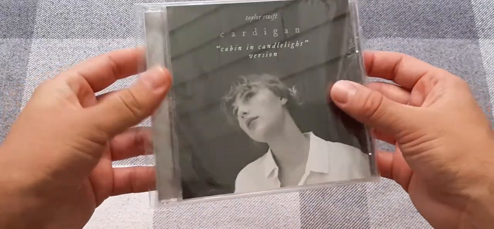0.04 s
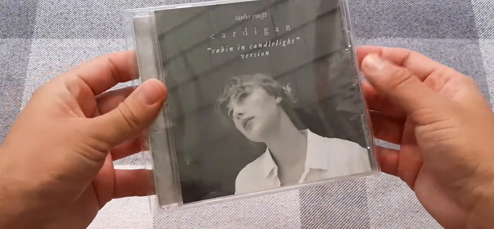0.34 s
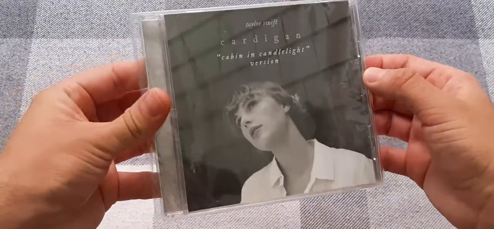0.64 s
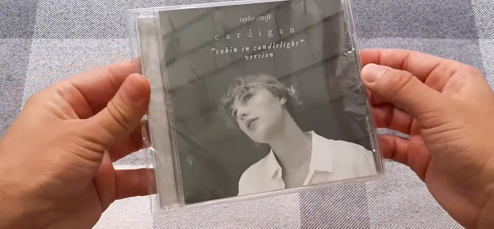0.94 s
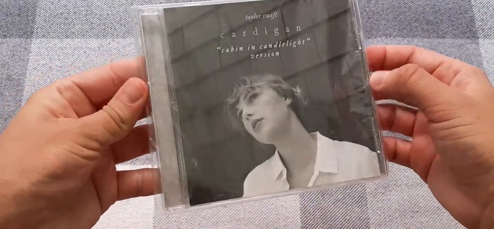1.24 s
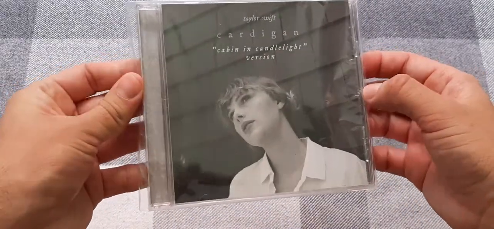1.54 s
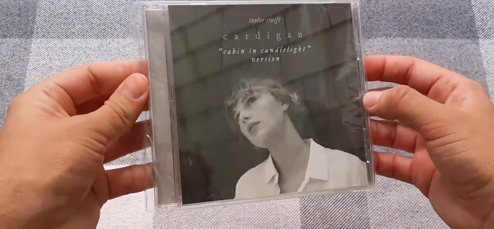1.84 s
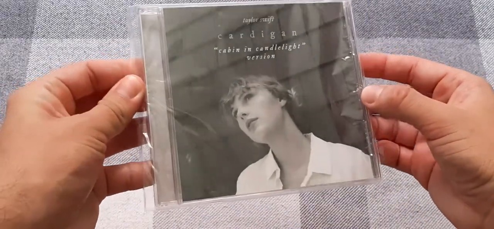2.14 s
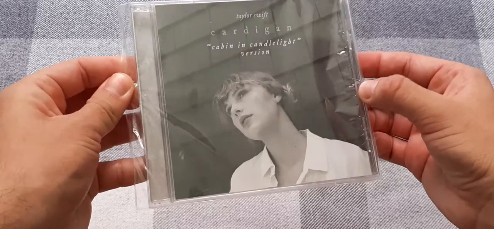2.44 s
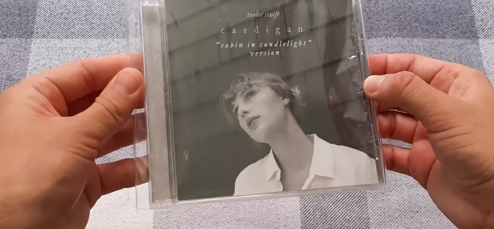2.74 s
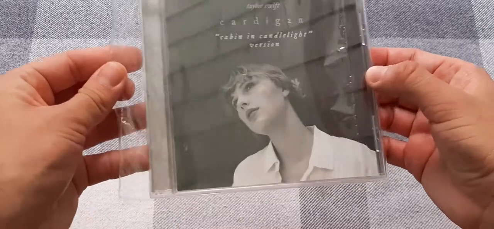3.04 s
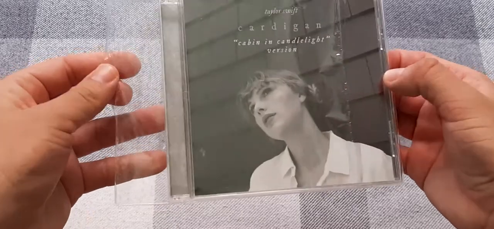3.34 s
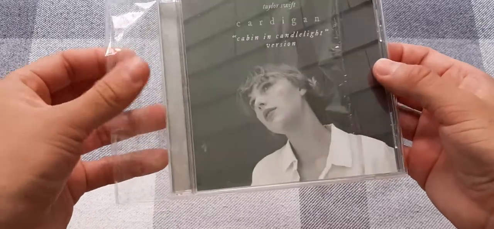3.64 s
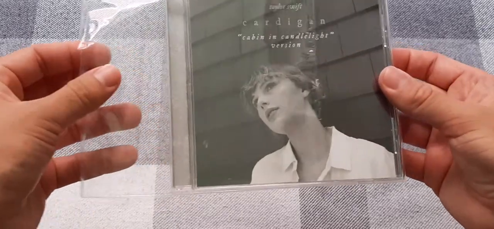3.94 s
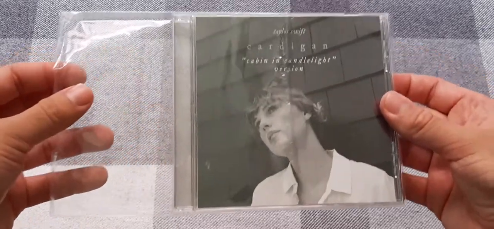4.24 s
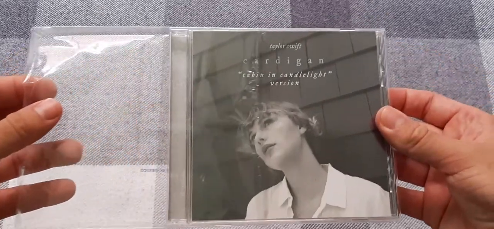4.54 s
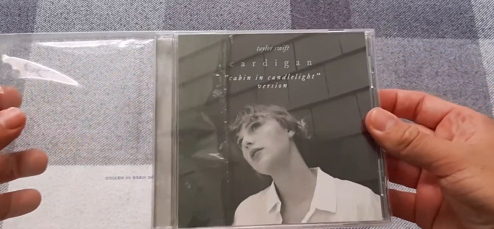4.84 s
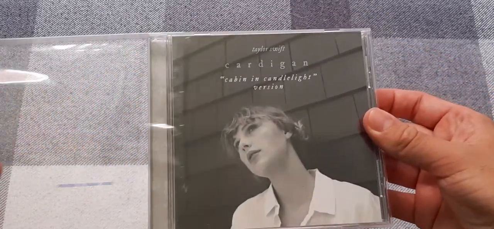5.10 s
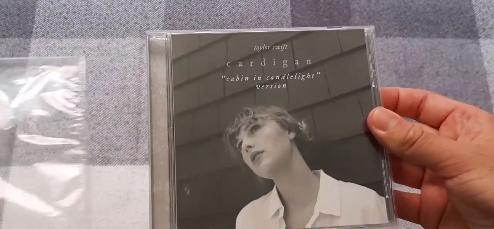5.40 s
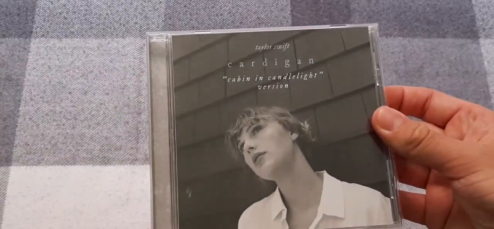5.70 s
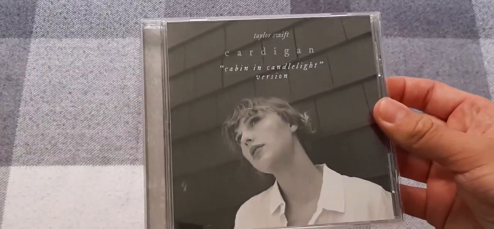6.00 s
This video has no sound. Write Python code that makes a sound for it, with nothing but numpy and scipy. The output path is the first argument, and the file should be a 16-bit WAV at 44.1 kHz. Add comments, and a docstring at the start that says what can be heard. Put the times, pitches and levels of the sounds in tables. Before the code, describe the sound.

Close, crisp crackling of plastic film being torn off a hollow plastic case, with a dull bump before the wrap is pulled away.

```python
"""Shrink wrap snaps and crinkles as two hands tear it off a thin plastic disc case, close to a
camera's stereo microphone and a little to its left, in a small room. Creases pop in the stretched
film and knock the hollow case, which bumps as the wrap comes loose. The sleeve of film is then
drawn off, ticking over the case's ribbed edge and ringing while taut, and is put aside.
Behind it are the room's short echo, a low rumble and faint hiss."""
import sys
import numpy as np
from scipy import signal
from scipy.fft import rfft, irfft, next_fast_len
from scipy.io import wavfile
from scipy.ndimage import uniform_filter1d

SR = 44100
rng = np.random.default_rng(int(sys.argv[2]) if len(sys.argv) > 2 else 0)


def wav_record(signal):
    """Record a signal, one row per channel, as 16-bit PCM in the file named by sys.argv[1]."""
    frames = np.transpose(np.atleast_2d(signal))
    bounded = np.clip(frames, -1, 1)
    # unit amplitude maps onto the largest positive 16-bit level
    quanta = np.round(bounded * 32767).astype(np.int16)
    wavfile.write(sys.argv[1], SR, quanta)


N = 276047
LEAD_IN_S = .003  # faint rise of noise just before a snap
WRAP_LOOSE_S = 3.72  # the fingers keep shifting on the wrap until then
STEADY_RIBS_PER_S = 100  # a steady pull on the sleeve


def loud_snaps():
    """Creases pop and tears jump. Returns the film's cracks and their knocks on the case beneath."""
    # the loudest pops: (time [s], level [dB], pitch [Hz], knock relative to the level [dB])
    pops = [(.0183, -35.5, 8520, -46), (.1089, -46, 7400, 1), (.1187, -43.5, 7300, -2),
            (.1592, -38.5, 10000, -1), (.3015, -50.5, 4700, -38), (.3498, -40.5, 3730, -11.5),
            (.3612, -38.5, 9400, -22), (.3871, -33.5, 11750, -16), (.4551, -62, 10200, -43),
            (.5745, -35, 8590, -37.5), (.639, -28.5, 13370, -42), (.7022, -32, 4220, -39),
            (.7107, -38.5, 13860, -10), (.7596, -42.5, 14500, -28), (.8762, -43.5, 14300, -13),
            (.9242, -44, 6000, -32), (.9761, -34.5, 2750, -39), (1.0096, -40.5, 12600, -9),
            (1.205, -45.5, 8320, -37.5), (1.2193, -49, 11690, -34), (1.2831, -29.5, 12700, -15),
            (1.2935, -32.5, 8500, -31), (1.3012, -30.5, 7600, -9), (1.3041, -33.5, 7070, -39),
            (1.4628, -48, 14300, -31), (1.478, -50, 12630, -18), (1.514, -33, 14820, -18),
            (1.5485, -37.5, 8980, -24), (1.5742, -39, 10900, -23), (1.6318, -36.5, 14000, -28),
            (1.669, -31, 8700, -16), (1.6881, -29, 9200, -31.5), (1.7067, -39, 6980, -38),
            (1.743, -44, 3110, -5.5), (1.8075, -46, 14300, -18), (1.8716, -38.5, 7150, -19.5),
            (1.8976, -26.5, 11390, -11.5), (1.992, -45, 11960, -5.5), (2.041, -43, 9240, -15),
            (2.0575, -34.5, 10630, -26.5), (2.0823, -37, 11900, -3), (2.2692, -50, 11700, -10),
            (2.3071, -42, 6750, -30.5), (2.338, -40.5, 4175, -37), (2.3743, -42.5, 6370, 1),
            (2.3949, -31.5, 11700, -41), (2.433, -37.5, 12000, -42), (2.564, -32, 12260, -33),
            (2.586, -29.5, 13250, -8), (2.6046, -31.5, 6060, -33), (2.6109, -26.5, 8960, -14),
            (2.6444, -29, 5500, -13), (2.6933, -39, 12300, -40.5), (2.8023, -29.5, 9400, -35),
            (2.8346, -22.5, 12520, -11), (2.8804, -33, 10980, -9.5), (2.9926, -34.5, 4760, -9),
            (3.0232, -30, 13800, -21), (3.0749, -31.5, 14100, -6.5), (3.1025, -31, 13200, -7),
            (3.1623, -37.5, 14300, -18), (3.2345, -26.5, 11300, -13), (3.3045, -40, 12250, 3),
            (3.3971, -38.5, 4750, -2), (3.4416, -37, 1720, 2), (3.478, -23.5, 6040, -9.5),
            (3.494, -29.5, 11300, -32.5), (3.5955, -44, 12300, -2.5), (3.7007, -37, 6400, -4),
            (3.704, -37.5, 6600, -3.5), (3.9043, -43, 6060, 3), (4.0786, -45, 5850, -17),
            (4.5061, -48, 5500, -9), (4.5246, -52, 11900, -3), (4.6366, -46, 4700, -1),
            (5.1, -38, 7740, -4), (5.25, -52, 5500, -6), (5.3445, -55, 6500, -14), (5.376, -50, 4560, -9),
            (5.4123, -50.5, 12100, -17), (5.8696, -48, 8600, -25), (5.902, -46.5, 3200, -33)]
    film, blows = np.zeros((3, N)), np.zeros(N)
    for s, db, pitch_hz, knock_db in pops:
        add(film, s - LEAD_IN_S, amp(db + .5) * facet_snap(pitch_hz))
        add(blows, s, amp([db + knock_db]))
    rattle = stereo_noise(amp(-1) * fading(blows, life_s=.00099))
    return film, through_case(amp(8.5) * blows + rattle, modes_db=-6.5)


def small_snaps(crinkling, count):
    """Lesser facets flip at random under the fingers, more often and louder in a harder grip."""
    ordinary_grip_db, centre_hz = -57, 8500
    film = np.zeros((3, N))
    effort = crinkling[:int(WRAP_LOOSE_S * SR)] / amp(ordinary_grip_db)
    chance = np.cumsum(np.minimum(effort, 1))
    for when, loud, high in rng.random((count, 3)):
        at = np.searchsorted(chance, when * chance[-1])
        gain = effort[at] ** .37 * amp(-47 + 5.5 * (2 * loud - 1.5))
        pitch_hz = centre_hz * 2 ** (.9 * (2 * high - 1))
        add(film, at / SR - LEAD_IN_S, gain * facet_snap(pitch_hz))
    return film


def facet_snap(pitch_hz, size=512):
    """One facet of film cracks and flutters, after a faint lead-in. Rows: left mic, right mic, room."""
    rise_s, life_s = .0009, .0011
    lean_db = rng.normal(1, 1.1)  # each facet faces the mics its own way
    t = np.arange(size) / SR - LEAD_IN_S
    flutter = rng.standard_normal(size) + 2.3 * rng.standard_normal((2, size))
    flutter *= np.where(t < 0, .4 * np.exp(-np.abs(t) / rise_s), np.exp(-np.abs(t) / life_s))
    push = np.vstack([1.3 * flutter / np.linalg.norm(flutter[0]), np.zeros(size)])
    push[:, int(LEAD_IN_S * SR)] += rng.choice([-1, 1])
    push[:2, int((LEAD_IN_S + rng.uniform(.0005, .0014)) * SR)] += .3  # bounce off the table
    # spectrum of snapping film: (frequency [Hz], level [dB])
    snap_colour = [(400, -32), (1200, -4.5), (2800, -1.5), (4300, 1), (5700, 1), (8000, 3), (10000, 2.5),
                   (13000, 1), (16000, 0)]
    peak_db = lambda hz: 9 * np.exp(-.5 * (np.log2((hz + 1) / pitch_hz) / .3) ** 2)
    facet = ring(lambda hz: along(snap_colour, hz) + peak_db(hz), size=size)
    crack = signal.fftconvolve(push, facet[None], axes=1)
    crack *= np.sqrt(.003 * SR) / np.linalg.norm(crack, axis=1, keepdims=True)
    return amp([[lean_db], [-lean_db], [0]]) * crack


def crinkle(case_gain, film_gain, fizz_gain):
    """Countless tiny creases of uneven size, over the smooth hiss of film rubbing on plastic."""
    # spectrum of crinkling film: (frequency [Hz], level [dB])
    film_colour = [(1200, -32.5), (2000, -6.5), (3000, -5.5), (4500, -5), (5700, -4.5), (8000, -8),
                   (10000, -5), (14000, -39)]
    # spectrum of its high fizz: (frequency [Hz], level [dB])
    fizz_colour = [(5000, -30), (8000, -6), (10000, -2.5), (12500, -.5), (15500, -1.5), (17000, -6)]
    creases_per_s = 300
    largest = 3.3 - 1.2 * np.minimum(5 * sleeve_speed(), 1)  # a freely sliding sleeve hardly buckles
    onsets = rng.random(N) < creases_per_s / SR
    creases = onsets * amp(2.5 * np.minimum(rng.exponential(size=N), largest))
    grain = unit(np.hypot(fading(creases, life_s=.0005), .4))
    body = case_gain * unit(through_case(stereo_noise(np.sqrt(grain)), modes_db=-10.5))
    film = film_gain * unit(coloured(stereo_noise(grain), film_colour))
    fizz = fizz_gain * unit(coloured(stereo_noise(grain), fizz_colour))
    return amp(-.5) * body + amp(-.41) * bending(film + fizz, depth_db=3)


def handling():
    """Crinkle gains for case, film and fizz: sliding, light touch, grips and swishes add in power."""
    # hiss of the sleeve at a steady pull: (case [dB], film [dB], fizz [dB])
    slide_db = [-83.5, -63, -58]
    # light touch of the fingers: (case [dB], film [dB], fizz [dB])
    touch_db = [-88, -80, -76]
    # squeezes and tugs: (time [s], hold [s], film level [dB], case re film [dB], fizz re film [dB])
    grips = [(0, 0.0083, -51, -5.5, 0), (0.103, 0.036, -53, -3, -2), (0.349, 0.097, -64.5, -8.5, 6),
             (.575, 0.022, -62, -8, 11), (0.641, 0.044, -54.5, -7, -5.5), (0.702, 0.028, -55, -14, 2),
             (0.781, 0.0313, -70.5, -24, 11.5), (0.888, 0.11, -56.5, -14.5, -2.5),
             (.975, 0.064, -55.5, -25, -6), (1.06, 0.25, -69.5, -11, 7), (1.244, 0.025, -63, -6, 7),
             (1.278, 0.011, -46, -8.5, 5.5), (1.47, .02, -69.5, 2, 12.5), (1.509, 0.12, -64.5, -2.5, -2.5),
             (1.685, 0.033, -54, -8.5, 3), (1.73, 0.015, -67.5, 2, 2), (1.81, .07, -67, -5, 3),
             (1.888, .035, -55, -6, 0.5), (1.96, 0.12, -62.5, -5, 8.5), (2.048, 0.015, -59, 2, 6.5),
             (2.325, .05, -61.5, -18, -7), (2.375, .065, -62.5, -5.5, 7), (2.5, 0.078, -56.5, -11, -1.5),
             (2.563, 0.024, -56, -6, 3), (2.578, 0.022, -43.5, -4, 0), (2.641, 0.092, -53, -9, -1),
             (2.768, .06, -60, -15.5, 7), (2.83, 0.078, -51, -7, 1), (2.973, 0.11, -52, 0.5, 3.5),
             (3.059, 0.074, -48, 0.5, 4.5), (3.161, 0.021, -50, -1.5, 4), (3.232, 0.13, -56.5, 1, 3),
             (3.394, .04, -54, -6.5, -0.5), (3.442, 0.012, -48.5, 0, 3), (3.478, 0.068, -50.5, -8, -2.5),
             (3.69, 0.049, -54.5, 0.5, 0), (3.75, 0.079, -62.5, -2, -2), (4.505, 0.016, -62, 0.5, -5),
             (5.172, 0.063, -53, -6, -1), (5.34, 0.11, -70.5, -16, -4), (5.89, 0.052, -66, -12, 1)]
    # loose film brushing: (time [s], length [s], film level [dB], case re film [dB], fizz re film [dB])
    swishes = [(3.85, .17, -60.5, 3, -12), (4.98, 0.3, -57, -7, 6.5), (5.639, 0.32, -68, -19, -1),
               (5.98, .16, -78, -12.5, -3.5)]
    t = np.arange(N) / SR
    power = (amp(slide_db)[:, None] * sleeve_speed() ** 1.18) ** 2
    power += amp(touch_db)[:, None] ** 2 * (t < WRAP_LOOSE_S)
    for s, hold_s, db, case_db, fizz_db in grips:
        grip = stroke(0, attack_s=.006, hold_s=hold_s, release_db_per_s=269)[:SR]
        add(power, s, (amp([[db + case_db], [db], [db + fizz_db]]) * grip) ** 2)
    for s, length, db, case_db, fizz_db in swishes:
        swell = np.sin(np.pi * t[t < length] / length)
        add(power, s, (amp([[db + case_db], [db], [db + fizz_db]]) * swell) ** 2)
    return np.sqrt(power)


def bending(x, depth_db):
    """The film's resonances wander as it bends: patches of random gain over frequency and time."""
    spectra = signal.stft(x, nperseg=256)[2]
    patches = uniform_filter1d(rng.standard_normal(spectra.shape[1:]), size=9, axis=0)
    patches = uniform_filter1d(patches, size=12, axis=1)
    return signal.istft(spectra * amp(depth_db * unit(patches)), nperseg=256)[1][:, :N]


def through_case(x, modes_db):
    """The hollow case answers like a broad plate with a few sharper resonances."""
    # response of the plate: (frequency [Hz], level [dB])
    case_colour = [(150, -34.5), (240, -19.5), (330, -5.5), (560, -9), (850, 0), (1040, -6), (1450, 5.5),
                   (2100, -6.5), (3000, -14.5), (4200, -45)]
    # resonances of the case: (frequency [Hz], width [Hz], relative level [dB])
    case_modes = [(432, 8.3, 11.5), (638, 13, -15.5), (725, 27, 8), (802, 16, 14), (910, 31, 3),
                  (1216, 36, -15), (1417, 420, -3), (1840, 30, -17.5)]
    modes = lambda hz: sum(amp(db) * 1j * hz * width / (centre ** 2 - hz ** 2 + 1j * hz * width)
                           for centre, width, db in case_modes)
    return filtered(coloured(x, case_colour), lambda hz: 1 + amp(modes_db) * modes(hz))


def case_bumps():
    """The case flexes with hollow knocks; the dullest comes as the wrap lets go."""
    # jolts of the case in the hand: (time [s], relative level [dB], pitch [Hz])
    jolts = [(0.7018, -38, 1890), (0.728, -44, 1903), (1.3175, -52, 820), (1.8975, -45.5, 1050),
             (1.9405, -47.5, 1050), (2.5859, -35.5, 920), (2.611, -41, 889), (2.644, -42.5, 830),
             (2.977, -46.5, 760), (2.993, -44, 810), (3.0227, -37.5, 695), (3.074, -44, 940),
             (3.105, -40, 650), (3.129, -41, 712), (3.187, -49, 640), (3.248, -46.5, 545),
             (3.306, -43.5, 727), (3.4415, -41.5, 430), (3.4768, -40, 308.6), (3.494, -48, 434),
             (4.523, -61, 390), (5.097, -58, 710), (5.25, -54, 600)]
    knocks = np.zeros(N)
    t = np.arange(SR // 8) / SR
    radiated_db = lambda hz: -10 * np.log10(1 + (255 / (hz + 20)) ** 12)  # a small panel sheds no bass
    for s, db, pitch_hz in jolts:
        peak_db = lambda hz: -12 * np.log2(1 + (np.log2((hz + 20) / pitch_hz) / 1.1) ** 2)
        panel = ring(lambda hz: radiated_db(hz) + peak_db(hz))
        rattle = .14 * rng.standard_normal(len(t)) * np.exp(-t / .0018)
        rattle[0] += 1  # the blow itself
        add(knocks, s, amp(db + 19) * signal.fftconvolve(rattle, panel))
    return np.array([knocks, knocks])


def sleeve():
    """The film's edge ticks once on every rib of the case, and the ticks keep the taut sleeve ringing."""
    # spectrum of a rib tick: (frequency [Hz], level [dB])
    tick_colour = [(500, -9), (1200, -17.5), (2000, -8), (3000, -16), (6000, -9), (10000, -1), (13000, 5),
                   (16000, -4)]
    # ringing of the taut sleeve: (frequency [Hz], level [dB])
    sleeve_colour = [(800, -39.5), (1100, -19), (1280, -9), (1750, -1.5), (2250, -1.5), (2550, -16),
                     (3500, -33.5)]
    # it rings higher as less of it stays on the case: (first pitch [ratio], last pitch [ratio])
    pitch_ratios = [0.98, 1.042]
    rise_ribs, slack_s, slack_db_per_s = 70, 4.952, 99
    speed = sleeve_speed()
    ribs_passed = np.cumsum(speed) * STEADY_RIBS_PER_S / SR
    ribs = np.diff(np.floor(ribs_passed), prepend=0)
    ticks = ribs * amp(3.5 - 4.5 * speed + 1.3 * rng.standard_normal(N))  # softer as the edge skims
    scratch = stereo_noise(amp(-50.5) * fading(ticks, life_s=.0009))
    clicks = coloured(amp(-35) * ticks + scratch, tick_colour)
    rubbing = np.hypot(fading(ribs, life_s=.004), .25)
    rubbing /= np.sqrt(uniform_filter1d(rubbing ** 2, size=2205))
    low, high = [coloured(stereo_noise(rubbing), np.array(sleeve_colour) * [ratio, 1])
                 for ratio in pitch_ratios]
    drawn = np.minimum(ribs_passed / rise_ribs, 1) ** 2
    rasp = np.sqrt(1 - drawn) * low + np.sqrt(drawn) * high
    taut = amp(-slack_db_per_s * np.maximum(np.arange(N) / SR - slack_s, 0))  # slackens near the end
    return clicks + amp(-57) * speed ** 1.8 * taut * rasp


def sleeve_speed(off_case_s=5.25):
    """Speed of the sleeve relative to a steady pull, for as long as it touches the case."""
    # a first tug, then the long pull: (time [s], speed [ribs/s])
    pull = [(3.03, 2.5), (3.11, 209.5), (3.18, 1), (3.75, 0), (3.8, 69), (3.93, 150.5), (4.03, 102),
            (4.12, 120), (4.21, 80), (4.26, 28), (4.41, 102), (4.58, 65), (4.75, 65.5), (4.84, 20),
            (4.91, 34.5), (5.08, 149.5), (5.25, 140.5)]
    t = np.arange(N) / SR
    return np.interp(t, *np.transpose(pull)) / STEADY_RIBS_PER_S * (t < off_case_s)


def thuds():
    """Dull swells of bass when the hands jolt."""
    # the wrap lets go, then is put aside: (time [s], attack [s], level [dB], pitch [Hz])
    jolts = [(3.46, 0.036, -57.5, 102), (5.9, 0.12, -68.5, 153.4)]
    db_per_octave = 20
    bass = np.zeros((2, N))
    for s, attack_s, db, pitch_hz in jolts:
        band = lambda hz: amp(-db_per_octave * np.abs(np.log2((hz + 1) / pitch_hz)))
        swell = stroke(s, attack_s, hold_s=attack_s, release_db_per_s=70)
        bass += amp(db) * swell * unit(filtered(stereo_noise(1), band))
    return bass


def room_echo(x):
    """The small room rings longest in the bass, and its echoes shift as the hands move."""
    # reverberation of the room: (frequency [Hz], time to fall 60 dB [s])
    decay_times = [(100, 0.99), (400, 0.29), (2000, 0.31), (7000, 0.13), (15000, 0.096)]
    wet = np.zeros((2, N))
    block = SR // 4
    echoes = stereo_noise(1)
    for start in range(0, N, block):
        pattern = np.roll(echoes, -start, axis=1)[:, :SR // 2]
        hz, t, spectra = signal.stft(pattern, SR, nperseg=256)
        decay = amp(-60 * t / along(decay_times, hz)[:, None])
        tail = signal.istft(spectra * decay, SR, nperseg=256)[1]
        tail *= 1 - np.exp(-np.arange(tail.shape[1]) / SR / .00074)
        tail /= np.linalg.norm(tail[0])
        add(wet, start / SR, signal.fftconvolve(x[:, start:start + block], tail, axes=1))
    return wet


def room_tone():
    """The room's own quiet: a low rumble with faint hiss."""
    # spectrum of the rumble: (frequency [Hz], level [dB])
    rumble_colour = [(35, -24.5), (60, -8.5), (85, -9), (110, 0), (150, -4.5), (200, -20.5), (500, -34)]
    # spectrum of the still air: (frequency [Hz], level [dB])
    air_colour = [(25, -35), (42, -13.5), (60, -5.5), (80, -6.5), (103, 3.5), (140, -8.5), (200, -9),
                  (400, -17), (700, -21.5), (1500, -29), (5000, -30.5), (16000, -33.5)]
    rumble = amp(-79) * unit(coloured(stereo_noise(1), rumble_colour))
    air = amp(-75) * unit(coloured(stereo_noise(1), air_colour))
    return rumble + air


def stereo_noise(envelope):
    """Noise under an envelope, less alike at the two mics in the treble."""
    # likeness of left and right: (frequency [Hz], correlation [ratio])
    likeness = [(100, 0.68), (500, 0.76), (1000, 0.78), (4000, 0.17), (14000, 0.057)]
    turn = lambda hz: np.arccos(np.clip(along(likeness, hz), -1, 1)) / 2
    shares = lambda hz: np.array([np.cos(turn(hz)), np.sin(turn(hz))])
    mid, side = filtered(rng.standard_normal((2, N)), shares)
    return envelope * np.array([mid + side, mid - side])


def stroke(s, attack_s, hold_s, release_db_per_s):
    """Envelope that rises at time s and dies away from hold_s later."""
    t = np.arange(N) / SR - s
    return np.clip(t / attack_s, 0, 1) * amp(-release_db_per_s * np.maximum(t - hold_s, 0))


def fading(pulses, life_s):
    """Envelope in which each pulse dies away with the time constant life_s."""
    keep = np.exp(-2 / (life_s * SR))
    return np.sqrt(signal.lfilter([1], [1, -keep], pulses ** 2))


def coloured(x, colour):
    """A stereo signal rung through a spectrum of (frequency [Hz], level [dB]) points."""
    return signal.fftconvolve(x, ring(lambda hz: along(colour, hz))[None], axes=1)[:, :N]


def ring(gain_db, size=4096):
    """Minimum-phase impulse response of energy 1, shaped by a dB curve of frequency."""
    cepstrum = irfft(np.log(amp(gain_db(np.fft.rfftfreq(size, 1 / SR))) + 1e-6))
    cepstrum[1:size // 2] *= 2
    cepstrum[size // 2 + 1:] = 0
    impulse = irfft(np.exp(rfft(cepstrum)))
    return impulse / np.linalg.norm(impulse)


def filtered(x, response):
    """Pass x through a complex response of frequency."""
    size = next_fast_len(N + SR // 2)
    return irfft(rfft(x, size) * response(np.fft.rfftfreq(size, 1 / SR)), size)[..., :N]


def along(points, hz):
    """Interpolate (frequency [Hz], value) points on a log axis."""
    frequencies, values = np.transpose(points)
    return np.interp(np.log(hz + 1), np.log(frequencies + 1), values)


def add(track, s, sound):
    """Mix a sound into a track at time s."""
    span = track[..., max(round(s * SR), 0):][..., :sound.shape[-1]]
    span += sound[..., :span.shape[-1]]


def amp(db):
    """Decibels to gain."""
    return 10 ** (np.asarray(db) / 20)


def unit(x):
    """Scale to rms 1."""
    return x / np.sqrt(np.mean(x ** 2) + 1e-20)


def scene():
    """The hands work close by and a little left, so the left mic hears them sooner and louder."""
    left_lead_s = 7 / SR
    case_gain, film_gain, fizz_gain = handling()
    cracks, knocks = loud_snaps()
    snaps = cracks + small_snaps(np.hypot(film_gain, fizz_gain), count=90)
    case_and_wrap = knocks + crinkle(case_gain, film_gain, fizz_gain) + sleeve() + case_bumps()
    case_and_wrap *= amp([[.9], [-.9]])
    arrival = lambda hz: np.exp(1j * np.pi * hz * left_lead_s * np.array([[1], [-1]]))
    direct = filtered(snaps[:2] + case_and_wrap, arrival)
    echo = amp(-8.5) * room_echo(snaps[2] + case_and_wrap)
    background = amp([[2.5], [-2.5]]) * (room_tone() + thuds())
    return direct + echo + background


def record(dry):
    """The camera cuts off steeply at its band limit."""
    top_hz = 16200
    return filtered(dry, lambda hz: 1 / np.sqrt(1 + (hz / top_hz) ** 160))


dry = scene()
out = record(dry)
wav_record(out)
```